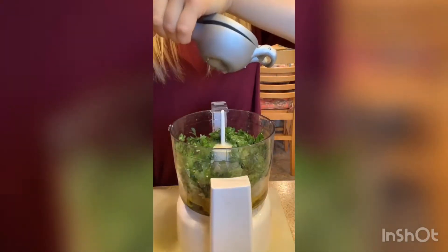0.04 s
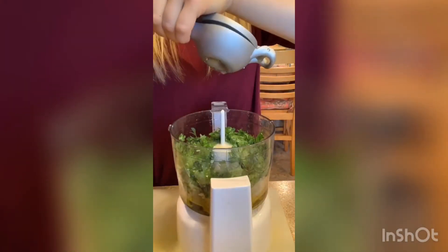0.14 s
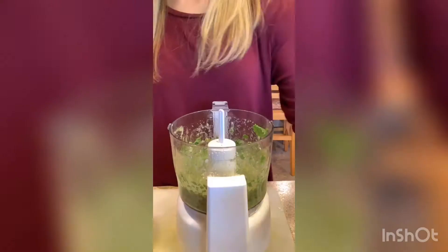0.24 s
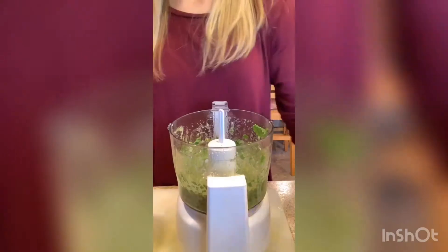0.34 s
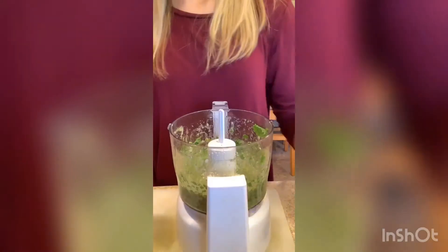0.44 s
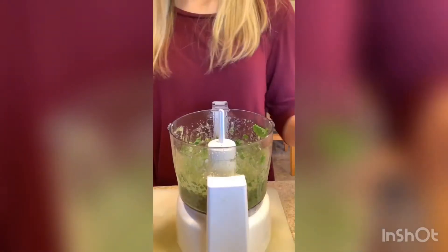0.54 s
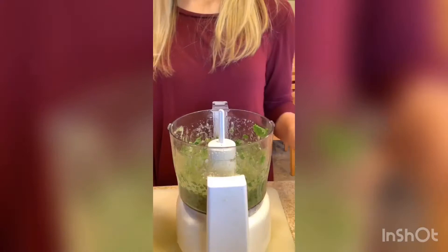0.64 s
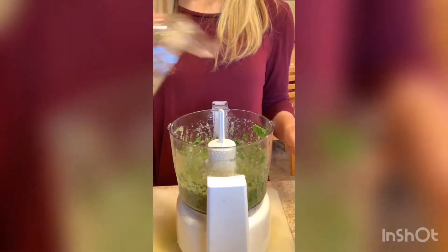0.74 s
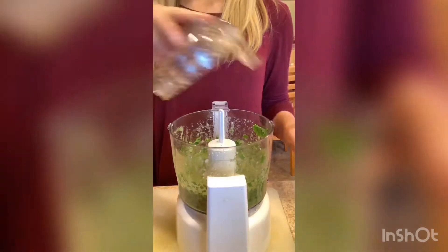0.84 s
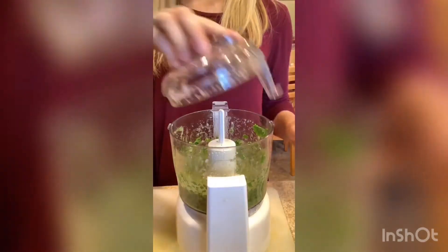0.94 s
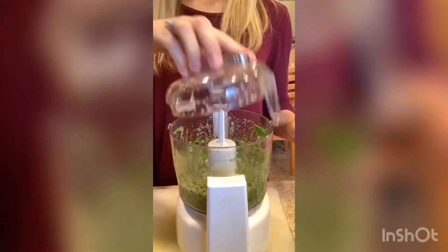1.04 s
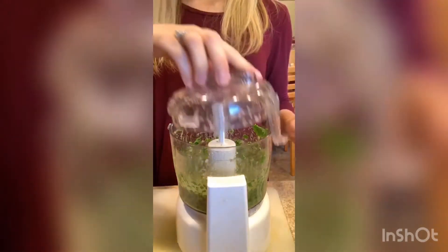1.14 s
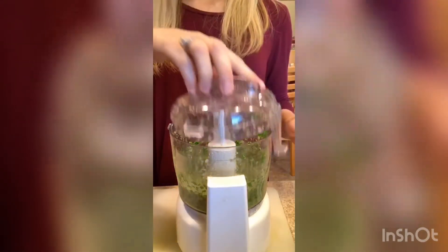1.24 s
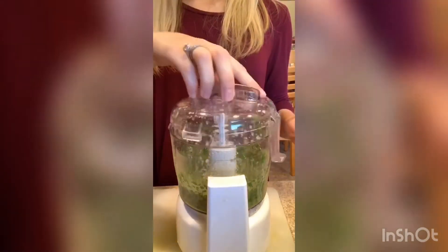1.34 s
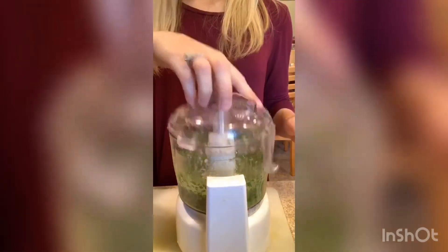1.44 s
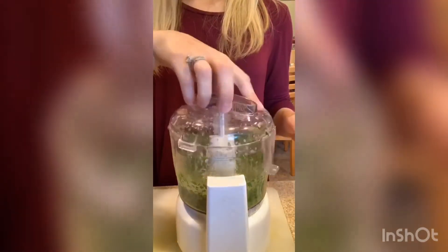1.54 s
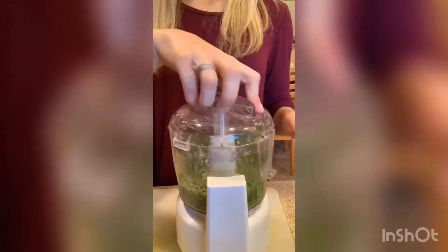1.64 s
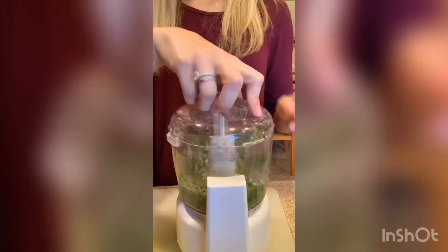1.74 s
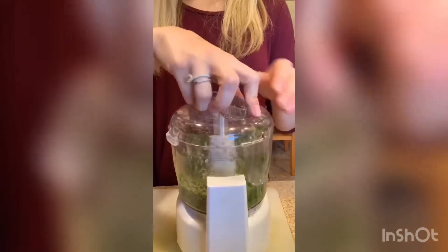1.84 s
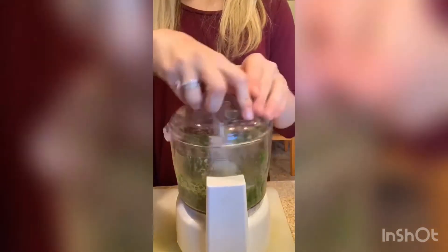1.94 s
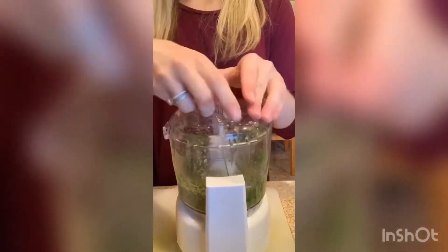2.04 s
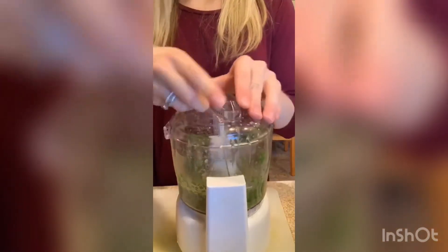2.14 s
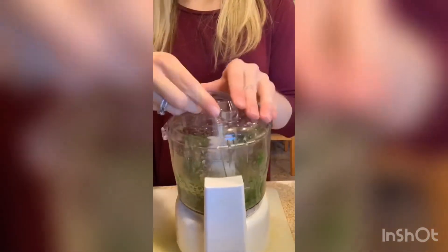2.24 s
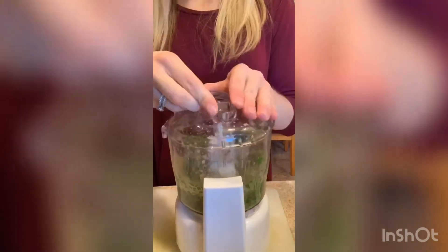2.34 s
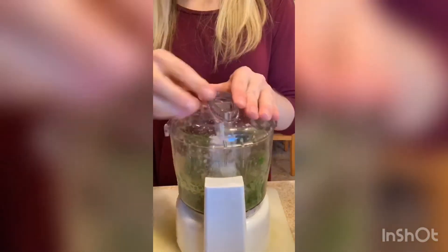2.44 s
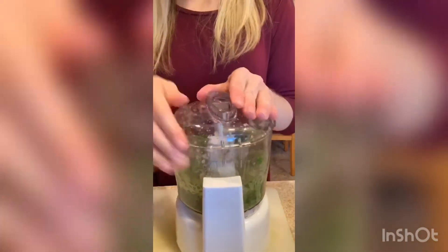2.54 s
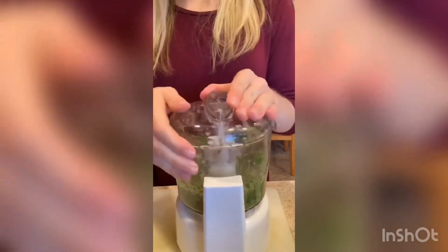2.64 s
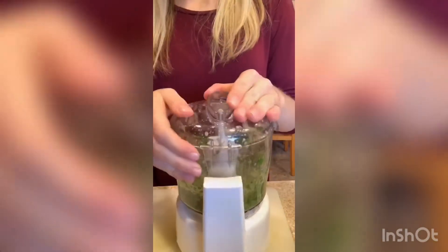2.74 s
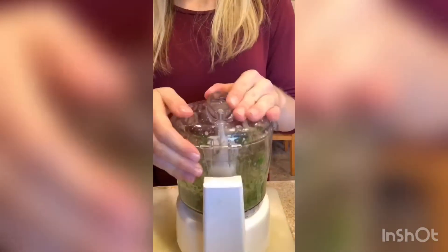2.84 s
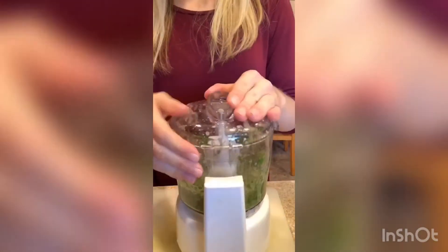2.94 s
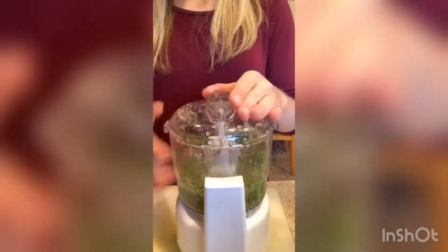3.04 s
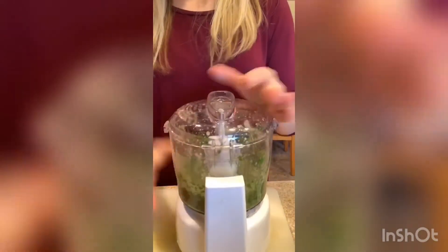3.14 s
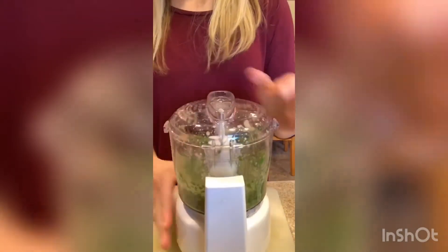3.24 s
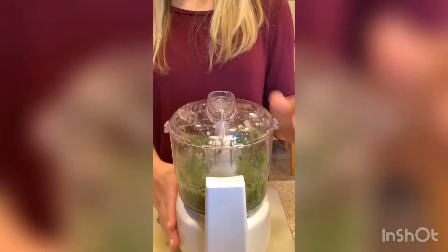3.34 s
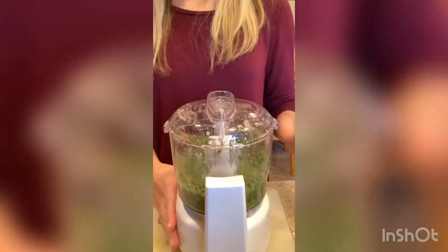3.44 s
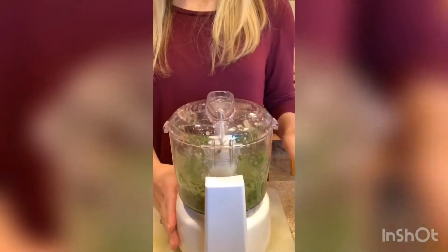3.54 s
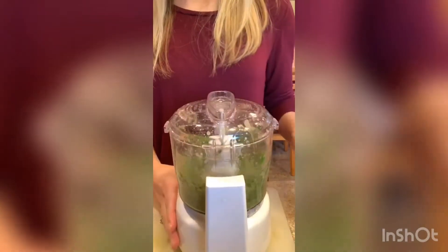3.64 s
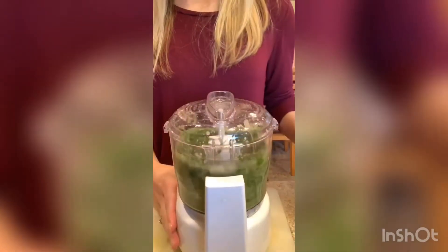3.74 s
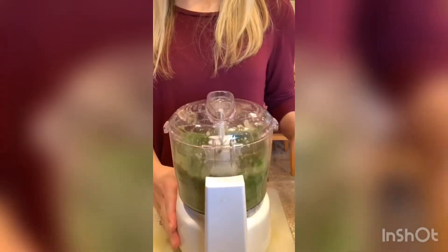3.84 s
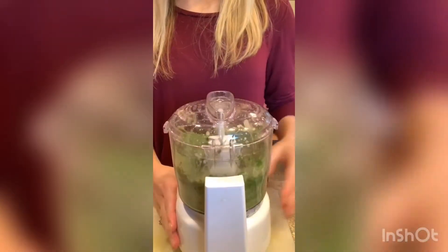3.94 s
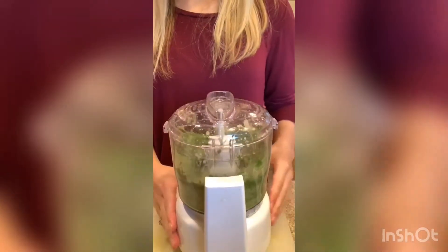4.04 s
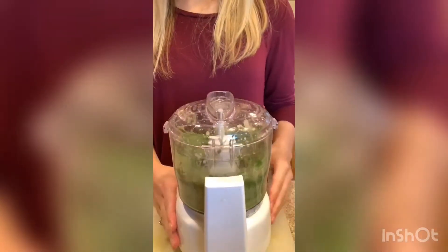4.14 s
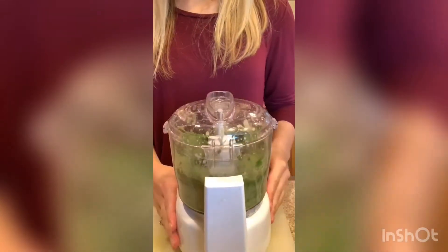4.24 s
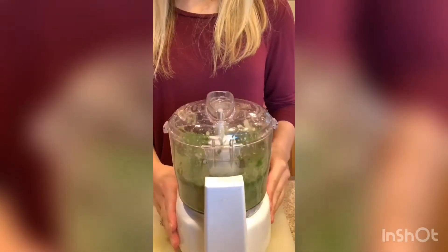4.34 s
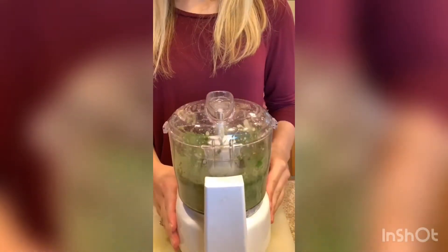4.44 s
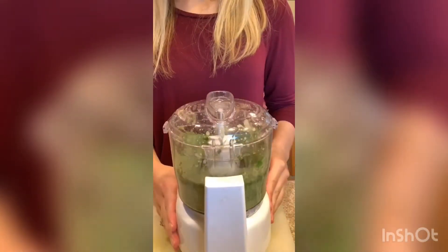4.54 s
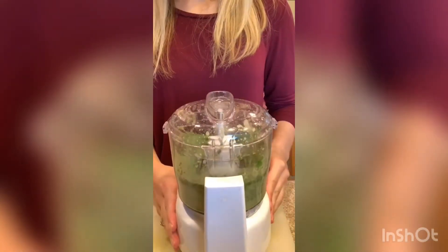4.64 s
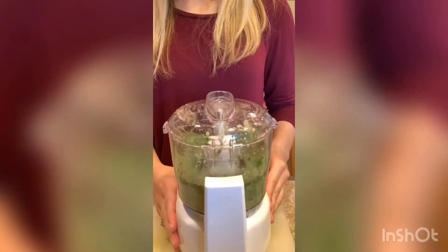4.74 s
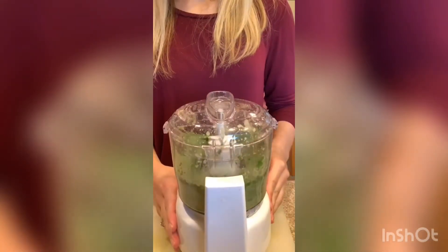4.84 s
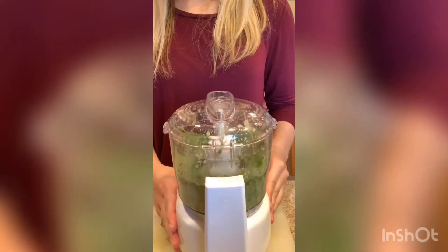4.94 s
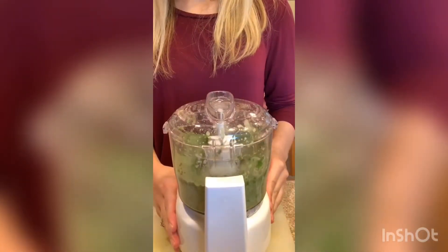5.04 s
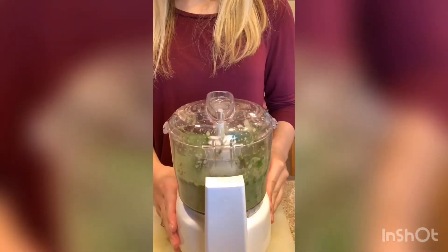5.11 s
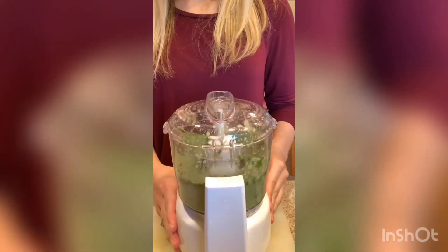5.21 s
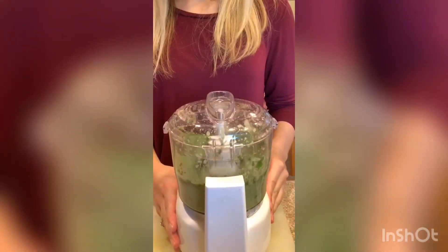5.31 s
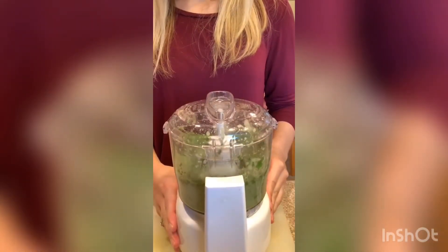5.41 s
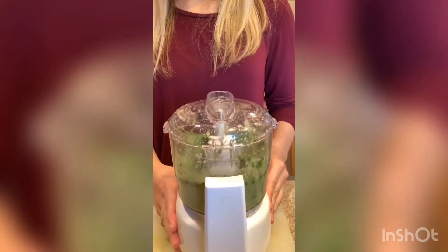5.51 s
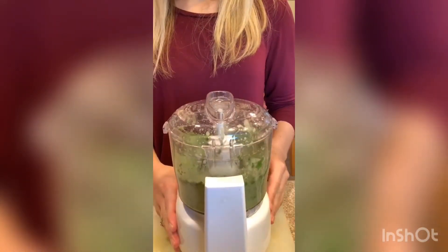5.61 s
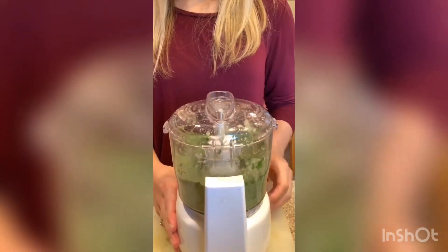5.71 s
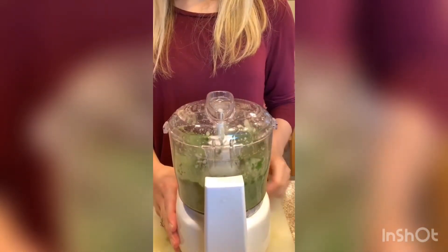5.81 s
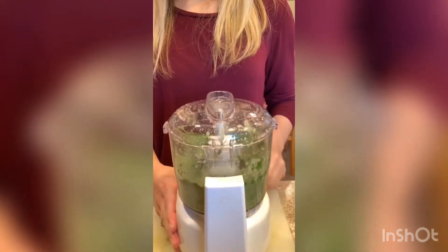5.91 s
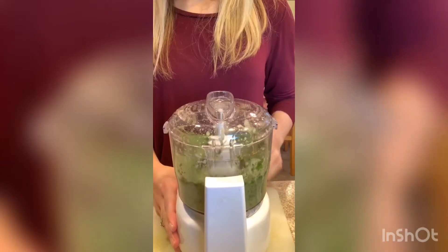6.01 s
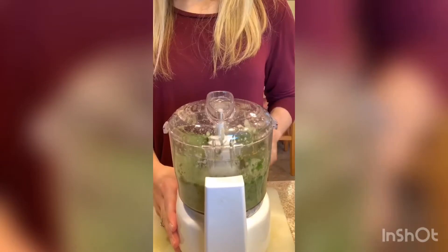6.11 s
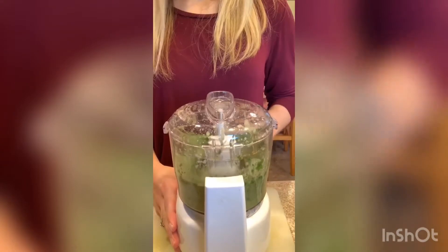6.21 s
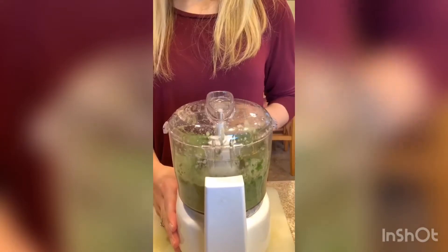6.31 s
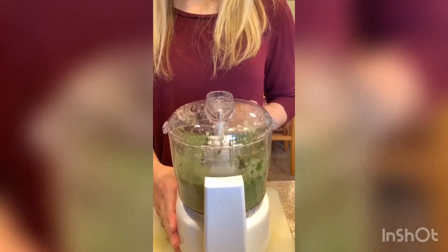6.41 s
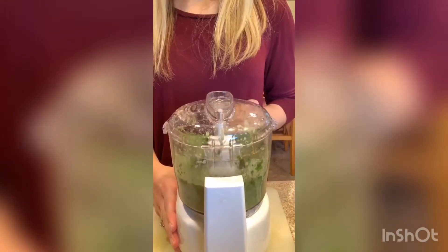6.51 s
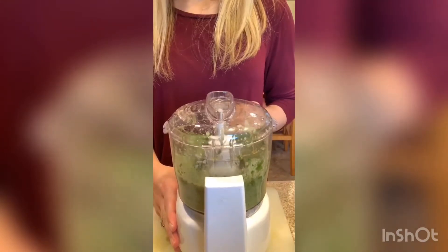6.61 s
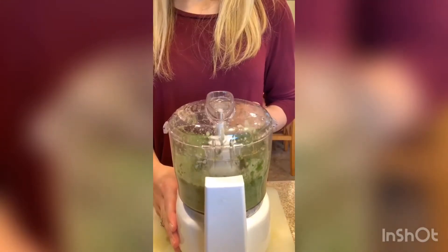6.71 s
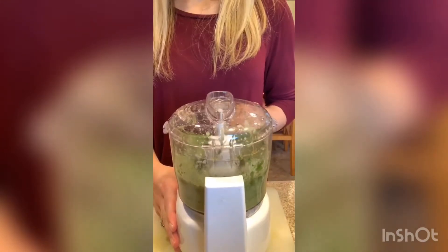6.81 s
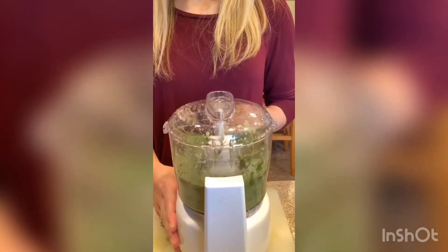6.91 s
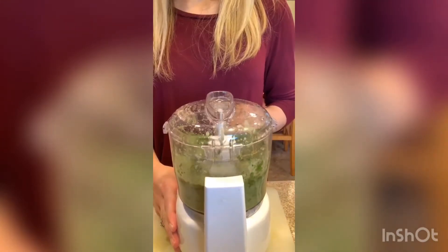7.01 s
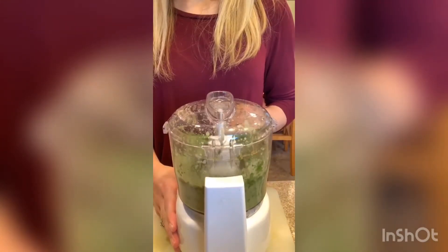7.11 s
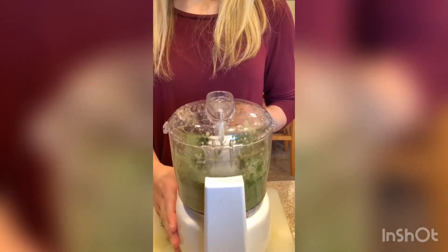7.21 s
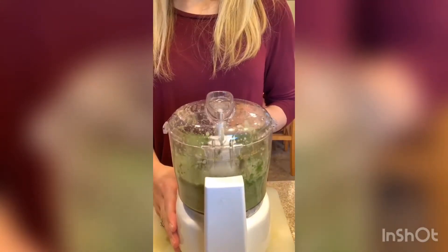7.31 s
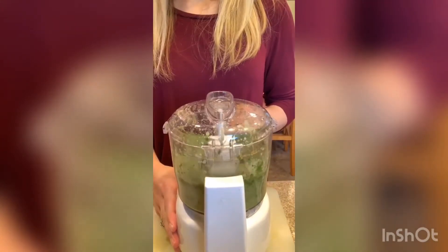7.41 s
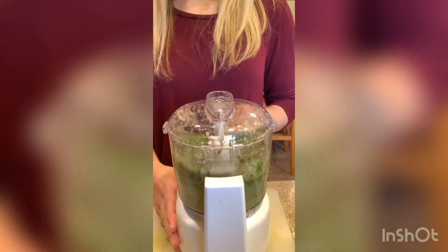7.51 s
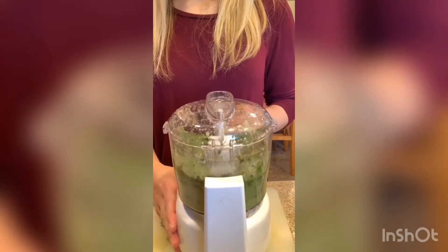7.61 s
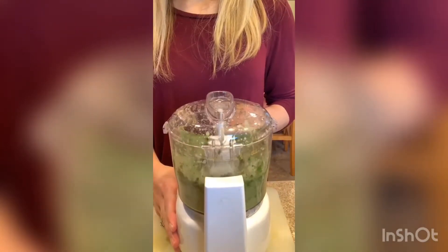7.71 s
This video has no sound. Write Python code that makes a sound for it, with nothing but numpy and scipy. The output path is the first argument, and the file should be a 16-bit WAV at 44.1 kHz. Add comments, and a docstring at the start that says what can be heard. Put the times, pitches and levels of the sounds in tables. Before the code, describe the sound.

In a quiet kitchen, a plastic lid knocks onto the bowl of a small food processor, scrapes round and snaps shut in a run of sharp clicks. After one more knock the motor spins up, briefly rattling leaves, and runs on with a loud, throbbing whine over a low drone and a rush of air with pattering herbs. The microphone is close, and the room rings a little.

```python
"""Quiet kitchen tone, with a brief dropout and two faint high rings. A plastic lid knocks onto the bowl
of a small food processor, scrapes round and snaps shut, each contact ringing the plastic. With one more
knock the motor spins up: leaves rattle through the first turns, the toothed drive whines and throbs with
each turn of the blade, the housing drones, and chopped herbs patter in the rush of air and brushes.
One close microphone in a live room."""
import sys
import numpy as np
from scipy import signal
from scipy.fft import rfft, irfft, next_fast_len
from scipy.io import wavfile

SR = 44100
rng = np.random.default_rng(int(sys.argv[2]) if len(sys.argv) > 2 else 0)


def generate_wav(signal):
    """Clip the signal to [-1, 1] and save it as 16-bit WAV at the path in sys.argv[1]."""
    frames = np.transpose(np.atleast_2d(signal))
    scaled = np.clip(frames, -1, 1) * 32767
    pcm = np.round(scaled).astype(np.int16)
    wavfile.write(sys.argv[1], SR, pcm)


N = 342216
TIME = np.arange(N) / SR

# colour of tiny impacts on plastic, from lid or leaves: (frequency [Hz], level [dB])
PLASTIC_COLOUR = [(200, -16.5), (700, 0.5), (1500, 5), (2800, -5.5), (5000, -10), (10000, -15.5),
                  (15000, -18)]


def from_db(db):
    """Decibels to gain."""
    return 10 ** (np.asarray(db) / 20)


def rms_one(x):
    """Scale to unit power."""
    return x / np.sqrt(np.mean(np.abs(x) ** 2) + 1e-20)


def in_time(rows):
    """Turn (time, values...) breakpoints into one envelope per value."""
    times, *columns = np.transpose(rows)
    return [np.interp(TIME, times, column) for column in columns]


def at_hz(points, hz):
    """Read a curve on a log-frequency axis."""
    freqs, values = np.transpose(points)
    return np.interp(np.log(np.maximum(hz, 1)), np.log(freqs), values)


def band(x, low, high):
    """Band-pass between two edges in Hz."""
    return signal.sosfilt(signal.butter(2, [low, high], "band", fs=SR, output="sos"), x)


def colour(x, spectrum, bumps=()):
    """EQ a steady sound with a broad curve plus bell-shaped peaks and notches; rms 1."""
    size = next_fast_len(N)
    hz = np.arange(size // 2 + 1) * SR / size
    eq_db = at_hz(spectrum, hz) + sum(db * np.exp(-((hz - f) / width) ** 2) for f, width, db in bumps)
    return rms_one(irfft(rfft(x, size) * from_db(eq_db), size)[:N])


def drift(rate_hz):
    """Smooth random modulation, rms about 1."""
    step, settle = 20, 4000
    pole = np.exp(-2 * np.pi * step * rate_hz / SR)
    noise = rng.standard_normal(N // step + settle + 2)
    slow = signal.lfilter([1], [1, -2 * pole, pole * pole], noise)[settle:]
    return np.interp(np.arange(N) / step, np.arange(len(slow)), rms_one(slow))


def grains(per_s, spread_db):
    """Random tiny impacts of uneven size; rms 1."""
    sizes = from_db(spread_db * np.minimum(rng.exponential(1, N), 4)) * rng.choice([-1, 1], N)
    return rms_one(sizes * (rng.random(N) < per_s / SR))


def tone(cycles, waver_db, slip_rad):
    """A sine whose level and phase waver; rms 1."""
    return rms_one(np.sin(2 * np.pi * cycles + slip_rad * drift(7.2)) * from_db(waver_db * drift(18)))


def room_tone():
    """A low, dark bed of noise that drops out briefly near the start."""
    spectrum = [(15, -22), (25, -0.5), (53, 0.5), (108, -9.5), (161, -12.5), (263, -20.5), (301, -20),
                (624, -31), (1330, -32), (3720, -44), (4250, -38.5), (4610, -44), (16000, -49)]  # colour of the bed: (frequency [Hz], level [dB])
    fader = [(0, -46.5), (.305, -46.5), (.312, -95), (.347, -95), (.353, -48.5), (1.3, -50), (2.4, -44.5),
             (3.5, -49.5)]  # its envelope: (time [s], level [dB])
    level_db, = in_time(fader)
    return from_db(level_db) * colour(rng.standard_normal(N), spectrum)


def pings():
    """Faint high rings that die away."""
    rings = [(.352, 4700, -62, .45), (.69, 4320, -76, 1.4)]  # decaying sines: (start [s], pitch [Hz], level [dB], t60 [s])
    return sum((TIME > start) * from_db(db - 60 * np.abs(TIME - start) / t60)
               * np.sin(2 * np.pi * hz * TIME) for start, hz, db, t60 in rings)


def knocks(ring_db=-16.0, crack_db=3.0, crack_t60_s=0.0033, trim_db=-4.0):
    """Each contact cracks, chatters and rings the bowl; returns the close sound and its reverb send."""
    # plastic contacts: (time [s], level before trim [dB], bump [dB], thud [dB], hollow [dB], clack [dB],
    # snap [dB], chatter t60 [s], send [dB]); the five registers and the send are relative to the level
    contacts = [(0.968, -50.5, -11, -10, -24, -9, -22, 0.04, -7),
                (1.305, -18.5, -22, -14, -1.5, -10, -13.5, 0.04, -11),
                (1.391, -25, -28, -4, -8, -10.5, -22, 0.04, -15),
                (1.413, -25.5, -21, -7, -20, -12, -15, 0.04, -4),
                (1.449, -13.5, -40, -11, -30, -5.5, -32.5, 0.04, -15),
                (1.457, -8, -26, -13, -28, -10, -30, 0.04, -13.5),
                (1.483, -19, -19, -2.5, -28, -9.5, -36, 0.04, -19.5),
                (1.587, -31, -19, -11, -20, -24, -25, 0.04, -10),
                (1.717, -34.5, -20, -12.5, -31, -11.5, -26, 0.04, -9.5),
                (1.93, -38, -19, -6, -23, -18, -24, 0.04, -9),
                (1.95, -35, -17, 1, -11, -10, -16, 0.04, -7.5),
                (1.974, -9.5, -30, -22, -31, -10.5, -12.5, 0.04, -18),
                (2.164, -50.5, -13, -19, -20.5, -10.5, -15, 0.04, -8.5),
                (2.236, -43.5, -10.5, -10, -14, -13.5, -23, 0.04, -9),
                (2.309, -33.5, -15, -16, -8, -13, -27.5, 0.04, -10.5),
                (2.355, -32, -21, -18, -31.5, -4.5, -13.5, 0.04, -11),
                (2.362, -30.5, -13, -5, -13, -10, -30, 0.04, -14),
                (2.439, -32.5, -18.5, -17, -19, -21.5, -15.5, 0.04, -10),
                (2.577, -39.5, -11.5, -19, -8.5, -12, -14.5, 0.04, -7),
                (2.6, -13, -27.5, -34.5, -25.5, -7.5, -13, 0.04, -13.5),
                (2.625, -15.5, -19, -27, -20.5, -10.5, -24, 0.04, -11.5),
                (2.669, -5, -29, -42.5, -35.5, -4.5, -14, 0.04, -9),
                (2.952, -38, -14, -16, -16, -11, -32, 0.04, -9),
                (3.017, -31, -33, -26, -26, 1, -11, 0.04, -14.5),
                (3.042, -36, -21, -19, -9.5, -2.5, -14.5, 0.04, -20),
                (3.091, -27.5, -19, -20, -18, -14, -42, 0.04, -16),
                (3.598, -24, -19, -13, -8.5, -7.5, -18, 0.04, 2)]
    edges = [55, 130, 380, 850, 3600, 12000]  # borders of the registers, bump to snap: (frequency [Hz])
    modes = [(73, -5.5, .3), (104, -1, 0.22), (180, 1.5, 0.18), (232, 1, 0.24), (326, 3, 0.11),
             (464, -9.5, .18), (522, -5, 0.1), (590, -1.5, 0.071), (989, -7, 0.11), (1135, -3.5, 0.089),
             (1280, -2.5, 0.096), (1440, -10, 0.12), (1640, -0.5, 0.048), (1760, -8, .14), (1910, -9, 0.14),
             (2640, -11, 0.12), (3060, -20, 0.11), (3430, -23.5, .11), (3950, -19.5, .1),
             (4900, -18.5, .07)]  # resonances of bowl and lid: (frequency [Hz], level [dB], t60 [s])
    close, send = np.zeros((2, N))
    t = np.arange(SR // 2) / SR
    hz, mode_db, t60 = np.transpose(modes)[:, :, None]
    for start, level_db, *register_db, chatter_t60, send_db in contacts:
        crack = from_db(crack_db - 60 * t / crack_t60_s)
        chatter = from_db(-60 * t / chatter_t60)
        contact = rng.standard_normal(len(t)) * (crack + chatter)
        strength = from_db(mode_db + ring_db + rng.normal(0, 1.98, hz.shape))
        strength *= rng.choice([-1, 1], hz.shape)
        ring = np.sum(strength * np.sin(2 * np.pi * hz * t) * from_db(-60 * t / t60), axis=0)
        # where and how hard the lid lands sets each register's share; alternate signs join them smoothly
        registers = [(-1) ** k * band(contact + ring, *edges[k:k + 2]) for k in range(len(register_db))]
        hit = sum(from_db(level_db + db + trim_db) * part / np.std(part[t < .025])
                  for db, part in zip(register_db, registers))
        at = round(start * SR)
        close[at:at + len(t)] += hit
        send[at:at + len(t)] += hit * from_db(send_db)
    return close, send


def kitchen(x, build_s=0.0045):
    """Reverb: diffuse reflections build up quickly and die away band by band."""
    decay = [(125, 0.5), (400, 0.53), (1000, 0.49), (2000, 0.51), (4000, 0.38), (8000, 0.36), (16000, 0.24)]  # the room's ring time: (frequency [Hz], t60 [s])
    t = np.arange(SR) / SR
    edges = np.geomspace(60, 17000, 13)
    tail = np.zeros(SR)
    for low, high in zip(edges, edges[1:]):
        t60 = at_hz(decay, np.sqrt(low * high))
        tail += band(rng.standard_normal(SR), low, high) * from_db(-60 * t / t60)
    tail *= 1 - np.exp(-(t / build_s) ** 2)
    return signal.fftconvolve(x, tail / np.linalg.norm(tail))[:N]


def scrapes():
    """Dense micro-slips swell and fade under each short stroke of the lid."""
    strokes = [(1.418, 0.035, -31.5, -1), (1.617, .05, -48, 3), (1.747, .07, -48.5, 6),
               (1.955, 0.033, -42.5, 3), (2.323, 0.057, -43.5, -4.5), (2.388, .05, -48, -7),
               (2.447, 0.035, -45, 11.5), (2.607, .03, -39.5, 6.5)]  # rim sliding on rim: (middle [s], length [s], level [dB], treble [dB])
    slips = colour(grains(per_s=5000, spread_db=-0.5), PLASTIC_COLOUR)
    treble = signal.sosfilt(signal.butter(1, 4500, "high", fs=SR, output="sos"), slips)
    out = np.zeros(N)
    for middle, length, db, treble_db in strokes:
        swell = from_db(db) * np.exp(-(2 * (TIME - middle) / length) ** 2)
        out += swell * (slips + (from_db(treble_db) - 1) * treble)
    return out


def tooth_whine(turns, steady_share=0.25, smear_hz=22.7):
    """Uneven teeth give sidebands one blade speed apart; backlash smears them, each turn swells them."""
    binding = [(3.6, 10), (3.8, 2), (3.95, 2.5), (4.2, 1), (4.33, -0.5), (4.7, 0.5), (5.1, 1.5),
               (5.5, -0.5), (5.7, 2), (6.1, 3.5), (6.75, 3.5), (7.0, -2), (7.4, -5.5), (7.76, -9)]  # the drive squeals as it binds: (time [s], squeal boost [dB])
    # whine bands: (centre [x blade speed], half width [x blade speed], level [dB], throb [dB],
    # share of the squeal boost [0-1])
    bands = [(55.88, 2.6, -4.5, 2.5, 0.33), (61.6, 2.95, -7, -1.5, 0.19), (114.25, 3.9, -6.5, 3, 0.46),
             (173.4, 3.3, -10.5, 7, 0.78)]
    squeal_db, = in_time(binding)
    step = 16  # samples per modulation point
    coarse = np.arange(0, N, step)
    smear = signal.butter(2, smear_hz, fs=SR / step, output="sos")
    offsets = np.arange(-8, 9)[:, None]
    out = np.zeros(N)
    for centre, width, db, throb_db, squeal_share in bands:
        steady = np.exp(2j * np.pi * rng.random(offsets.shape))
        noise = rng.standard_normal((len(offsets), len(coarse), 2)) @ [1, 1j]
        loose = rms_one(signal.sosfilt(smear, noise))
        strength = np.sqrt(steady_share) * steady + np.sqrt(1 - steady_share) * loose
        sidebands = strength * np.exp(2j * np.pi * offsets * turns[coarse])
        sidebands /= 1 + np.abs(offsets / width) ** 3
        flutter = np.interp(np.arange(N), coarse, sidebands.sum(axis=0))
        throb = from_db(throb_db * np.cos(2 * np.pi * turns))
        whine = np.real(flutter * throb * np.exp(2j * np.pi * centre * turns))
        out += from_db(db + squeal_share * squeal_db) * rms_one(whine)
    return out


def shaft_tones(turns):
    """Clean tones of the shaft, gliding with the blade's speed."""
    partials = [(1, -19), (8.9, -22.5), (17.6, -29.5), (30, -20), (51.45, -18.5), (53.75, -13), (57, -24),
                (59, -30.5), (60, -11.5)]  # shaft tones: (pitch [x blade speed], level [dB])
    return sum(from_db(db) * tone(ratio * turns, waver_db=2.5, slip_rad=0.48) for ratio, db in partials)


def drone(turns, spin, rotor_ratio=3.65, rotor_db=-2.5, inrush_db=17.0, rumble_db=-3.0):
    """The low end: the rotor's note, mains hum in the stator and the rumbling housing."""
    mains = [(120, -12.5), (240, -13)]  # stator hum: (frequency [Hz], level [dB])
    spectrum = [(20, -27), (32, -15), (42, -17), (55, -11), (70, -12), (92, 0), (145, -11), (180, 7.5),
                (205, -0.5), (230, 6), (265, 1), (300, -14), (420, -22), (900, -50)]  # housing rumble: (frequency [Hz], level [dB])
    rotor = spin ** 2 * from_db(rotor_db) * tone(rotor_ratio * turns, waver_db=2.5, slip_rad=0.61)
    hum = sum(from_db(db) * tone(hz * TIME, waver_db=4.0, slip_rad=0.37) for hz, db in mains)
    inrush = from_db(inrush_db * (1 - spin))  # starting current drives the hum harder until up to speed
    rumble = spin * from_db(rumble_db) * colour(grains(per_s=500, spread_db=2.5), spectrum)
    return rotor + inrush * hum + rumble


def rush(patter_db=-6.0, flicker_db=1.42):
    """Air, brushes and the patter of flung herbs, heard through the housing's resonances."""
    spectrum = [(100, -8), (300, 1), (400, -1.5), (500, 8), (620, -6.5), (830, -6.5), (1050, 2),
                (1900, -2.5), (2500, 1.5), (4200, 1), (8000, -1), (12000, 0.5), (14000, -9), (16000, -14)]  # broad colour of the rush: (frequency [Hz], level [dB])
    housing = [(694, 57, 6), (1420, 110, 7), (1618, 64, 5.5), (3530, 245, 5.5), (3844, 134, 5),
               (4470, 95, 4), (5000, 160, 3), (5600, 230, 1), (9800, 250, -2.5), (10200, 220, -3),
               (10770, 180, 4.5), (11020, 250, -6.5)]  # resonances and notches: (frequency [Hz], width [Hz], gain [dB])
    flow = rng.standard_normal(N) + from_db(patter_db) * grains(per_s=900, spread_db=5.5)
    return colour(flow * from_db(flicker_db * drift(110)), spectrum, housing)


def leaf_rattle(spin):
    """Whole leaves rattle round the bowl, fading as the blade comes up to speed."""
    return (1 - spin) * colour(grains(per_s=1700, spread_db=-1.0), PLASTIC_COLOUR)


def motor(start_s=3.592, attack_s=0.008, rush_db=8.5, leaves_db=1.5, send_db=-10.0):
    """The motor spins up and runs; blade speed carries the pitch of teeth, shaft and rotor."""
    blade_speed = [(3.59, 8), (3.63, 22), (3.7, 37.5), (3.75, 44), (3.8, 48), (3.86, 50.3), (3.92, 51.2),
                   (4.0, 51.54), (4.14, 51.8), (4.28, 51.95), (4.42, 52.16), (4.56, 52.04), (4.7, 52.0),
                   (4.84, 51.76), (4.98, 51.94), (5.12, 52.01), (5.26, 51.99), (5.4, 52.35), (5.54, 52.52),
                   (5.68, 52.26), (5.82, 52.03), (5.96, 51.87), (6.1, 51.92), (6.24, 51.92), (6.38, 51.79),
                   (6.52, 51.95), (6.66, 52.03), (6.8, 51.91), (6.94, 52.19), (7.08, 52.15), (7.22, 52.44),
                   (7.36, 52.85), (7.5, 52.98), (7.64, 52.97), (7.76, 53.13)]  # spin-up and wavering run: (time [s], speed [turns/s])
    faders = [(3.6, -44, -42, -31), (3.63, -27, -20, -15), (3.67, -25, -22, -21), (3.8, -24, -19, -16.5),
              (3.87, -26, -21, -13.5), (4.2, -25.5, -20.5, -13.5), (4.24, -27, -26, -12),
              (4.27, -24.5, -20, -17), (4.31, -25, -19, -14), (4.48, -26.5, -22, -15.5),
              (4.64, -25.5, -25, -15.5), (4.77, -25.5, -18.5, -14.5), (4.84, -26.5, -26, -14.5),
              (4.91, -26.5, -19, -15), (5.08, -26, -25.5, -16), (5.14, -26.5, -20, -15),
              (5.64, -27, -25, -15.5), (5.7, -26, -21, -15.5), (6.07, -27, -24, -16),
              (6.47, -26.5, -20.5, -16), (6.58, -29, -25, -17.5), (6.6, -26, -21, -16.5),
              (6.77, -27, -22.5, -16), (7.76, -26.5, -23, -12.5)]  # layer envelopes: (time [s], noise [dB], drone [dB], whine [dB])
    speed, = in_time(blade_speed)
    noise_db, drone_db, whine_db = in_time(faders)
    turns = np.cumsum(speed) / SR
    spin = np.clip(speed / np.median(speed[TIME > start_s]), 0, 1)  # 1 at running speed
    teeth = spin ** 0.74 * from_db(whine_db) * tooth_whine(turns)
    shaft = spin ** 2 * from_db(whine_db) * shaft_tones(turns)
    low_end = from_db(drone_db) * drone(turns, spin)
    air = from_db(noise_db + rush_db) * rush()
    leaves = from_db(noise_db + leaves_db) * leaf_rattle(spin)
    switched_on = np.clip((TIME - start_s) / attack_s, 0, 1)
    bright = switched_on * (teeth + air + leaves)
    return bright + from_db(send_db) * kitchen(bright) + switched_on * (shaft + low_end)


def scene(scrape_send_db=-26):
    """Room tone, rings, lid and motor, mixed to mono."""
    knocking, knock_send = knocks()
    sliding = scrapes()
    bed = room_tone()
    lid_reverb = kitchen(knock_send + from_db(scrape_send_db) * sliding)
    return (bed + pings() + knocking + sliding + lid_reverb + motor())[None]


def record(dry, ceiling=0.88, low_cut_hz=30.0, high_cut_hz=15800):
    """A low cut, a soft clip that rounds the loudest peaks, then a steep high cut."""
    heard = signal.sosfilt(signal.butter(2, low_cut_hz, "high", fs=SR, output="sos"), dry)
    rounded = heard / (1 + (heard / ceiling) ** 6) ** (1 / 6)
    return signal.sosfilt(signal.ellip(10, .2, 80, high_cut_hz, fs=SR, output="sos"), rounded)


dry = scene()
out = record(dry)
generate_wav(out)
```